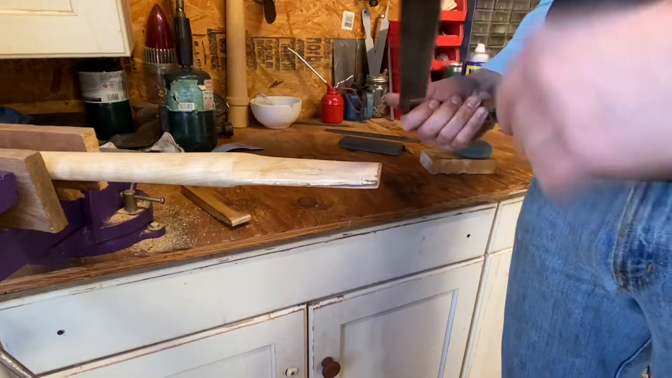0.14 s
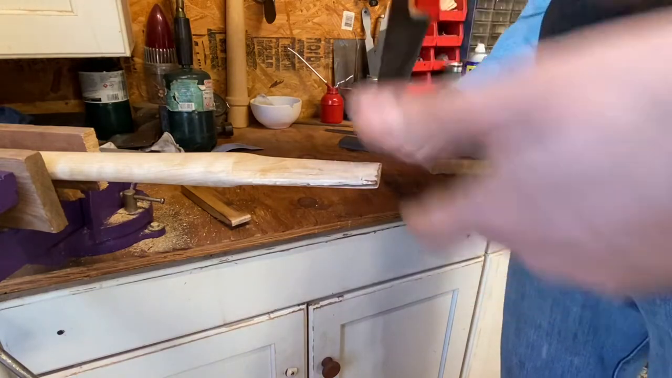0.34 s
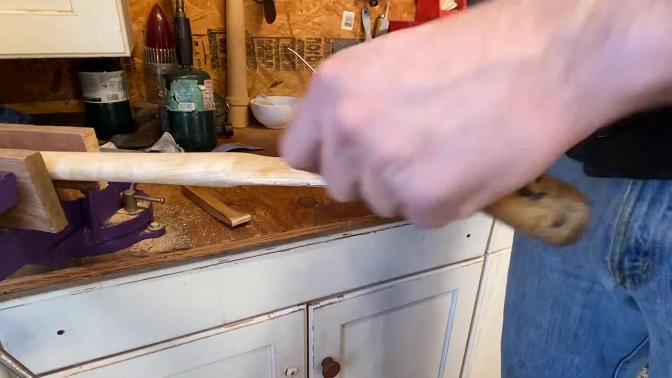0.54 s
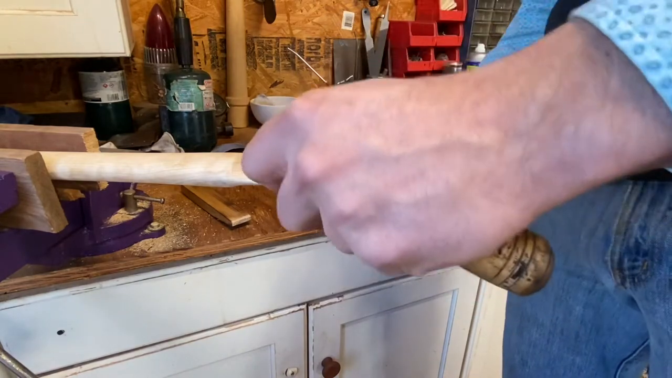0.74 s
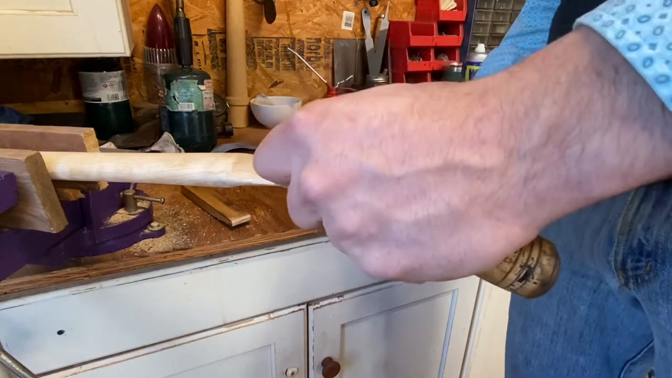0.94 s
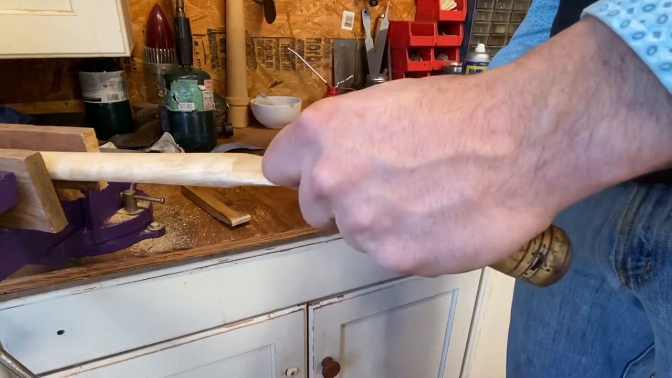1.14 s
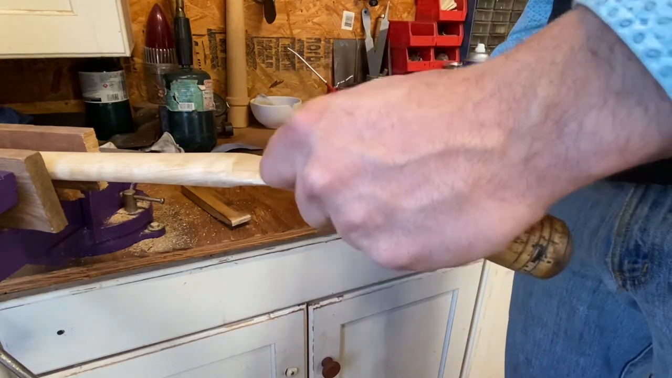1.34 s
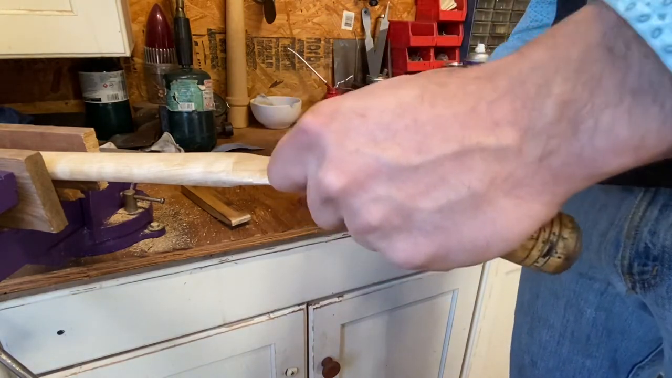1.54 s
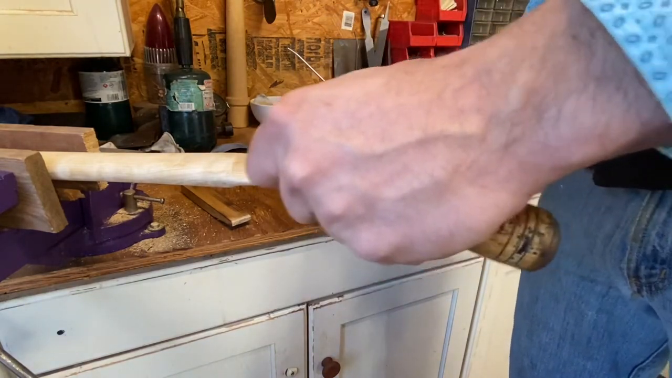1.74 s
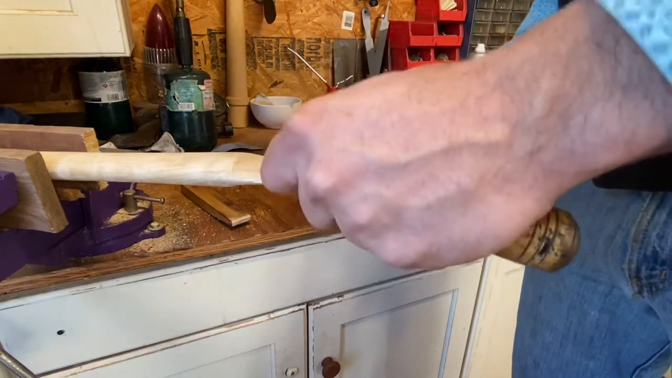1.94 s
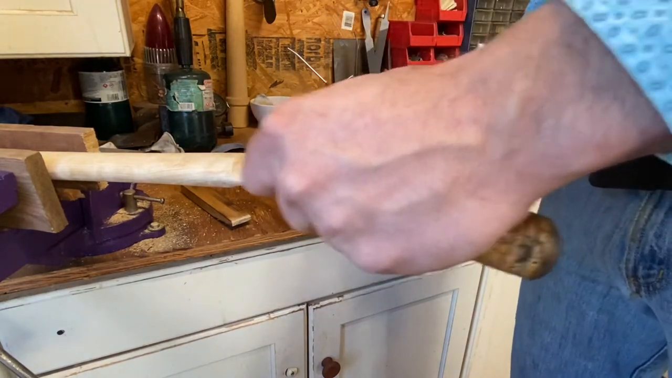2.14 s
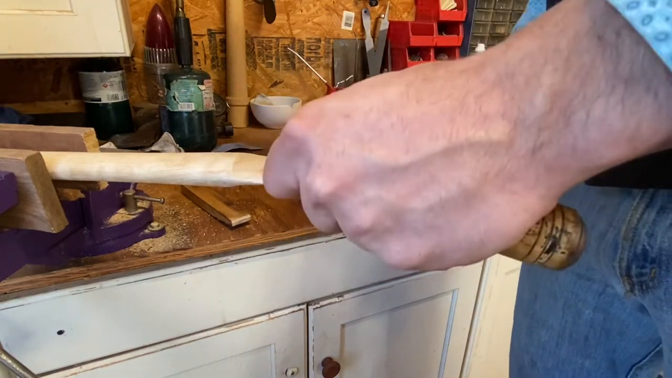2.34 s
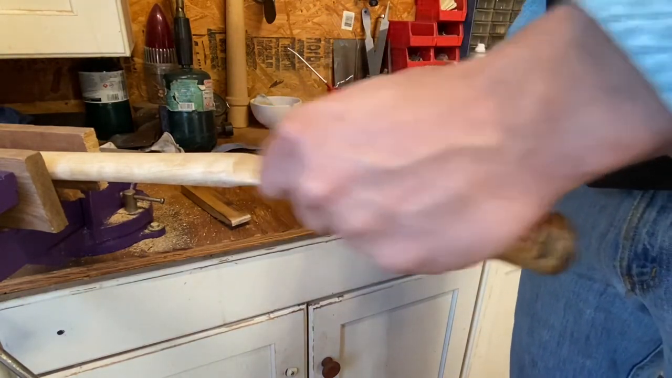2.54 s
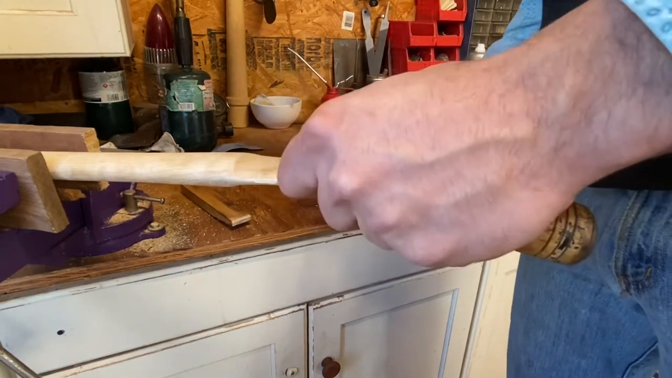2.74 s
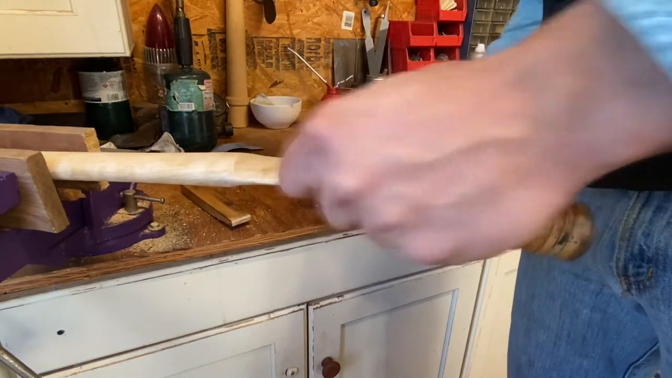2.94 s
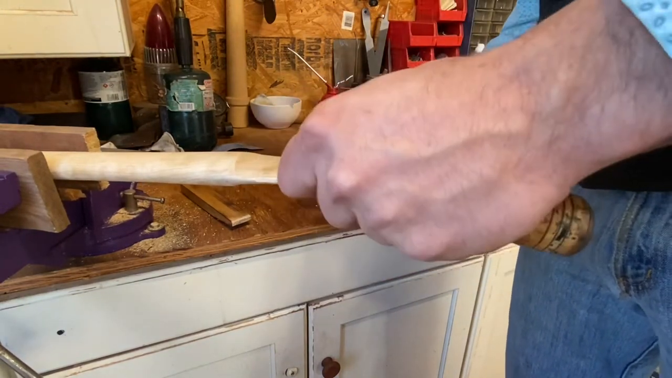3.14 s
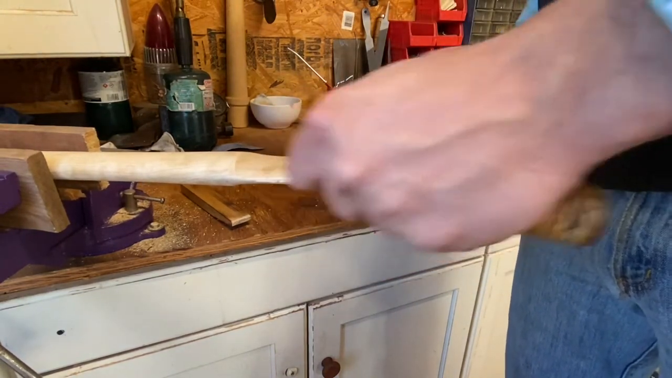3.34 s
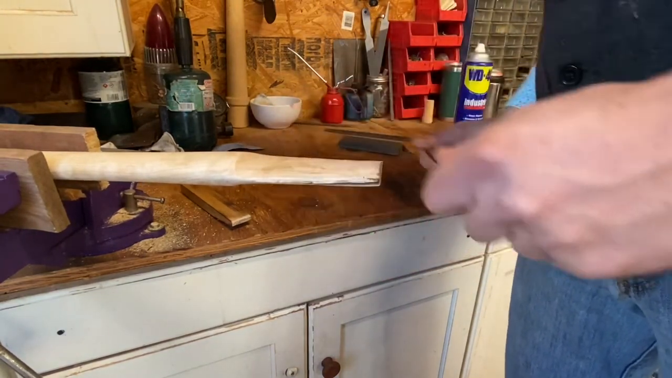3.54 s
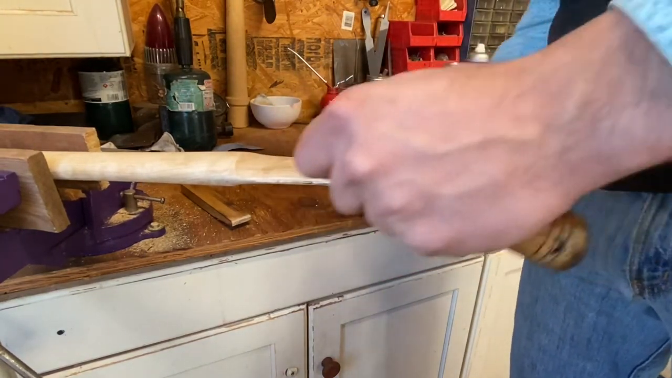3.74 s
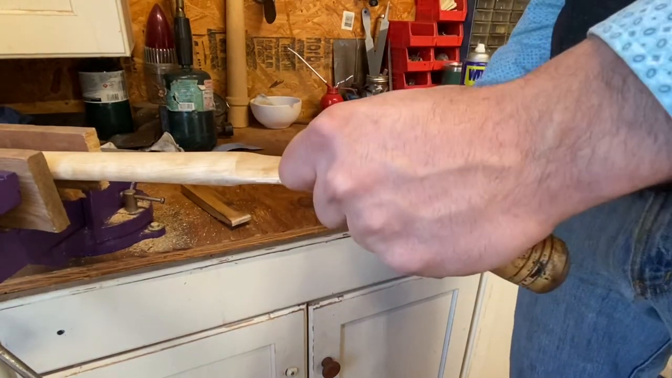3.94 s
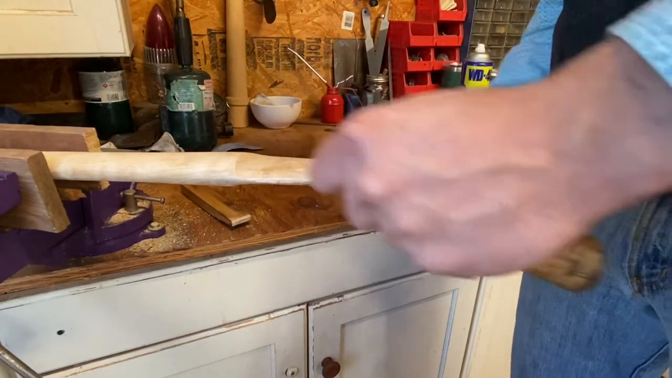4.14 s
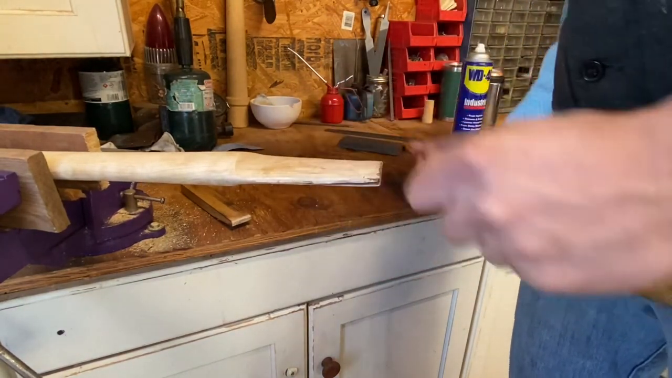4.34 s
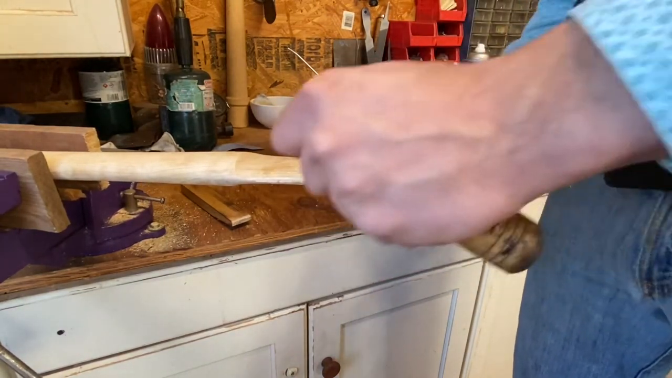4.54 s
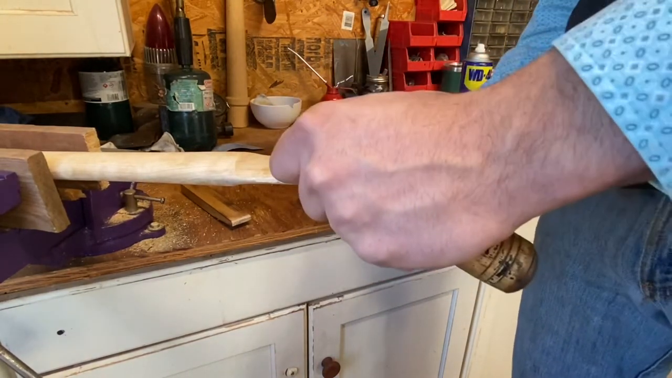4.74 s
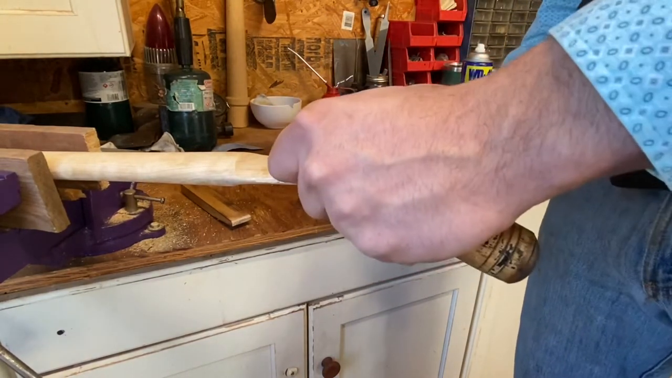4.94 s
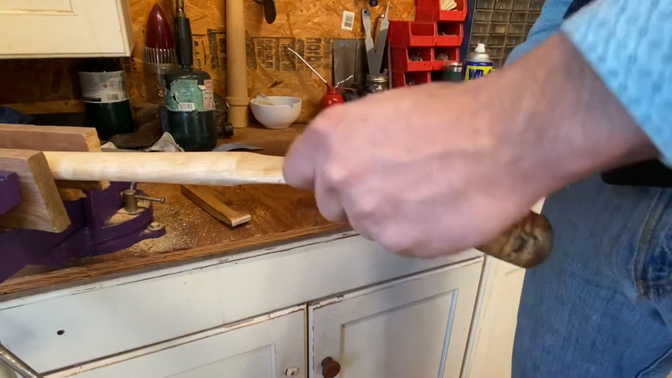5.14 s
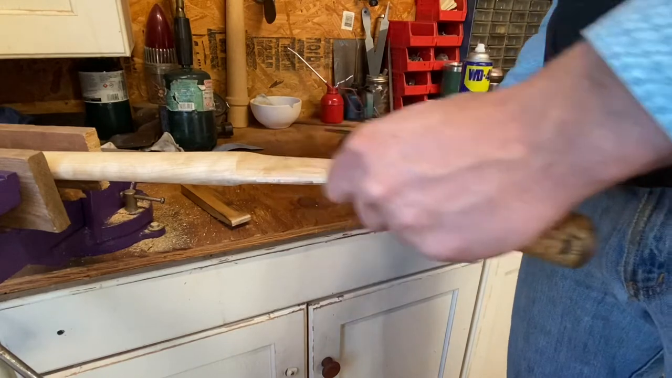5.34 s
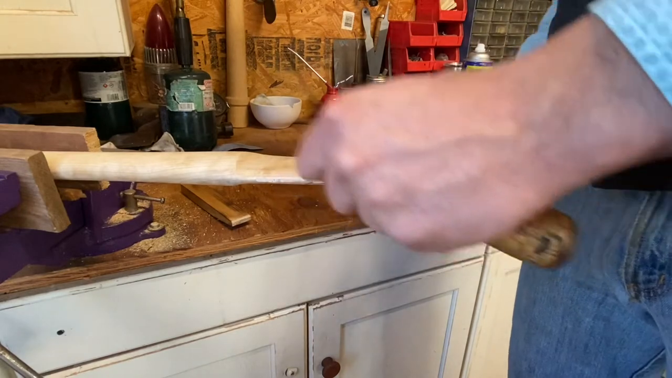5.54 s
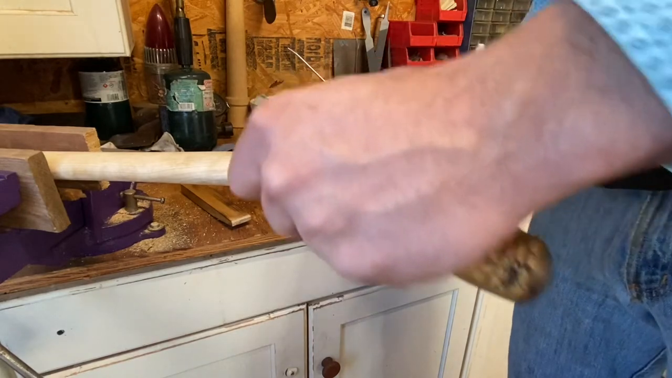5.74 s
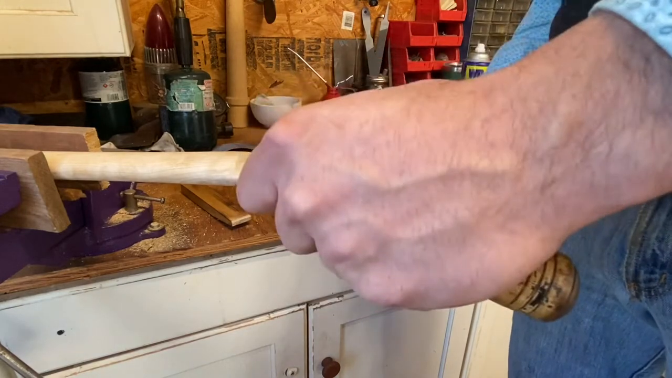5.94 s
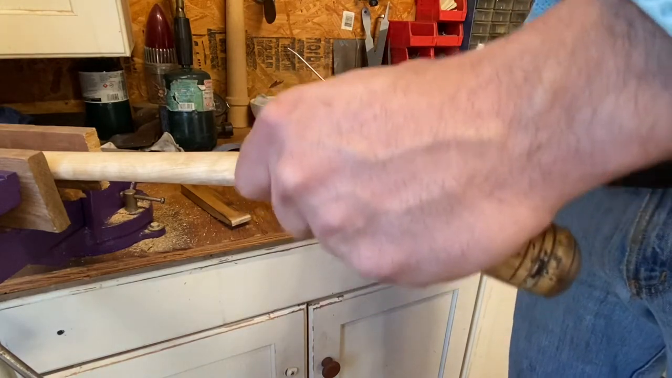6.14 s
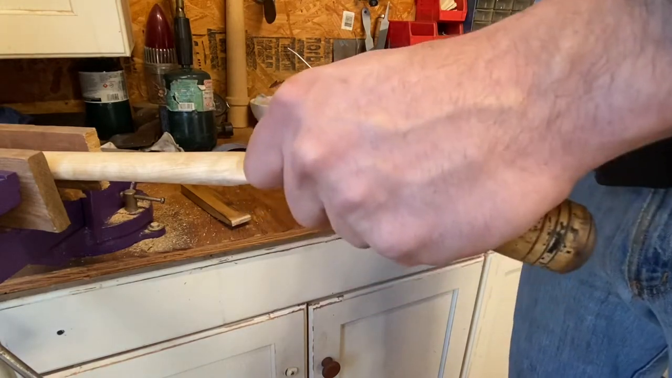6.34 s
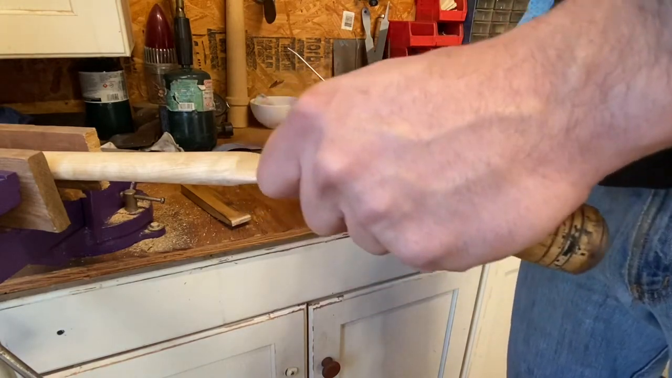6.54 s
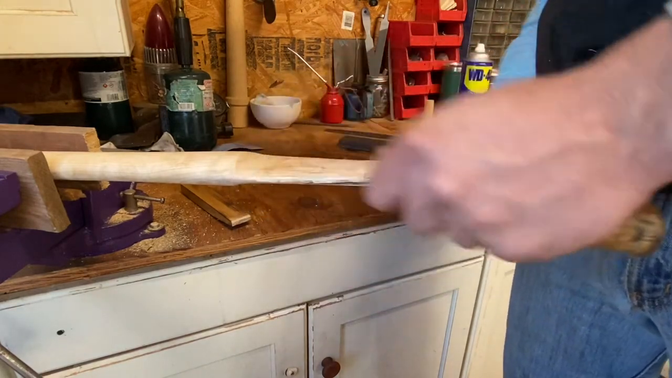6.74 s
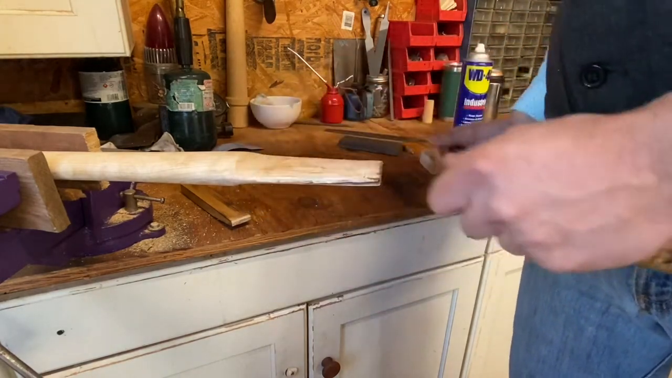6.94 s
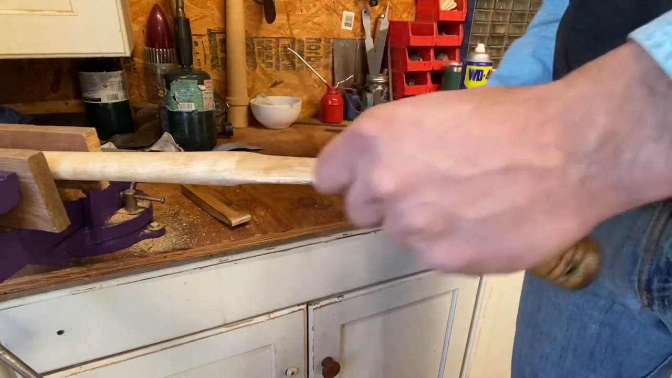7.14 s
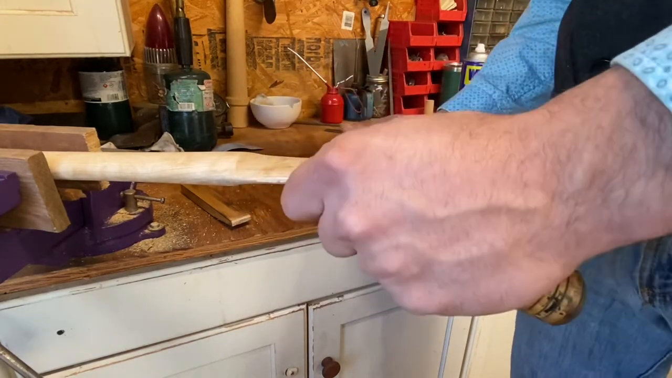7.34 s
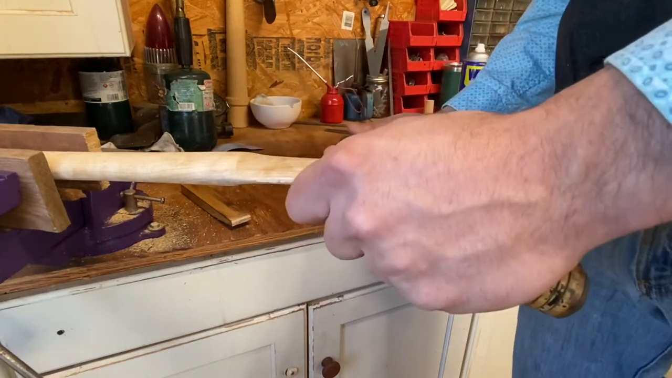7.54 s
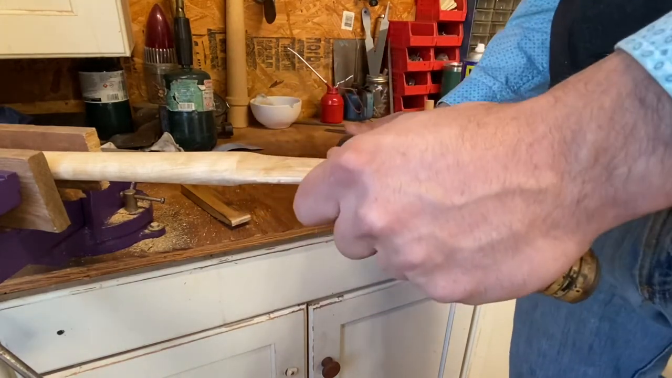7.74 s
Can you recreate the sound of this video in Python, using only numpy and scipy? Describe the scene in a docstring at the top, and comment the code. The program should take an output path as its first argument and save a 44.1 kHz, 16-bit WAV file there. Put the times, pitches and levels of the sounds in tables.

```python
"""In a small workshop a drawknife shaves a stick held in a bench vice, heard close by in stereo.
Each pull rasps as filtered stick-slip noise and shakes the stick's modes; most pulls end in a knock as the
chip breaks: a noise burst through wood, blade and bench top. The bench booms in deep decaying modes after
each knock. Sliding back, the blade rubs softly and sings. Faint rustles and fading hiss lie over a low
room rumble, both as coloured noise."""
import sys
import numpy as np
from scipy import signal
from scipy.fft import rfft, irfft
from scipy.io import wavfile
from scipy.ndimage import uniform_filter1d

SR = 44100
rng = np.random.default_rng(int(sys.argv[2]) if len(sys.argv) > 2 else 0)


def store_wav(level_fs):
    """Save 16-bit WAV to argv[1]."""
    pcm = np.round(np.clip(np.atleast_2d(level_fs), -1, 1) * 32767)
    wavfile.write(sys.argv[1], SR, pcm.T.astype(np.int16))


N = 343980

# Cutting pulls, each catch of the edge a row; end level before the source gains:
# start_s, length_s, end_level_db, swell_db, stick_shake_db
PULLS = [(0.952, 0.049, -49, 18, -1), (1.009, 0.032, -55, -2, 18.5), (1.411, 0.059, -42, 21, 13.5),
         (1.738, 0.064, -40.5, 30.5, 8), (2.089, 0.063, -39.5, 24.5, 1), (2.459, 0.069, -41, 25.5, -16),
         (2.858, 0.062, -38.5, 30, -8), (3.224, 0.068, -42.5, 29.5, 6), (3.98, 0.061, -44, 27, 11),
         (4.049, 0.048, -45, 1.5, 13), (4.094, 0.075, -44.5, 12.5, -12), (4.868, 0.025, -64.5, 10, -9),
         (5.043, 0.051, -40, 23.5, 2), (5.213, 0.018, -49.5, 21, 5), (5.253, 0.1, -57.5, -2, -20),
         (6.094, 0.04, -60.5, -1, -1), (6.568, 0.079, -42.5, 18.5, 16), (6.643, 0.069, -42.5, 22, 1),
         (7.394, 0.049, -56, 3.5, 14), (7.744, 0.049, -59, 14, 18.5)]
# Light rubs as the blade slides back, before the source gains: start_s, length_s, level_db, singing_pitch_hz
RUBS = [(1.305, 0.14, -58, 4840), (1.635, 0.14, -61, 4910), (1.98, 0.13, -59, 4760),
        (2.325, 0.15, -54.5, 4950), (2.695, 0.21, -57.5, 4990), (3.085, 0.15, -61, 4940),
        (3.925, 0.044, -67.5, 2473), (6.025, 0.047, -77.5, 2470), (6.462, 0.069, -59, 2490),
        (7.32, 0.1, -60, 2330), (7.58, 0.056, -73, 2470), (7.67, 0.075, -76, 2430)]
# Broad colour of the rasp, relative: frequency_hz, density_db_per_hz
RASP_SPECTRUM = [(250, 31), (1000, 14.5), (3000, 5), (7000, -16.5), (11500, -24.5), (13300, -21.5),
                 (15000, -35.5)]
# Resonances of the blade, relative: frequency_hz, width_hz, level_db
BLADE_RESONANCES = [(1000, 250, -3), (1800, 300, -5), (2550, 450, -3), (3300, 300, -5), (4980, 900, 4),
                    (6800, 600, -3)]
# Modes of the clamped stick, relative: frequency_hz, level_db, t60_s
STICK_MODES = [(1020, 12, 0.014), (1324, 6, 0.012), (1660, 4, 0.014), (2500, 4, 0.011)]
# Knocks, edge and steel relative to the crack, before the source gains:
# start_s, crack_db, edge_db, low_boom_db, high_boom_db, steel_db
KNOCKS = [(0.708, -49, 2.5, -37.5, -38.5, 1.5), (1.035, -41.5, 6.5, -23, -25, 0),
          (1.475, -30.5, 12, -18, -20, 8.5), (1.796, -32.5, -8, -25, -24, -8),
          (2.15, -23.5, 2.5, -14.5, -19, -14), (2.524, -27.5, 4.5, -25, -19.5, -5.5),
          (2.913, -31.5, -7, -21, -18, 3), (3.277, -39.5, 13.5, -16.5, -23.5, 1.5),
          (3.294, -29.5, -2, -19.5, -22.5, -8), (3.808, -43.5, -17, -39, -37, -10),
          (4.098, -52, -2, -22, -33, -1), (4.161, -24, -9, -19, -25.5, -9),
          (4.658, -41, -0.5, -31.5, -33.5, 2), (4.825, -75, -8, -35.5, -49, 16.5),
          (4.889, -53.5, 5, -28, -33, -19), (5.095, -39.5, -3, -24.5, -29.5, -6),
          (5.228, -45.5, 8, -25.5, -34.5, 6.5), (5.750, -42, 5.5, -30, -32, 7),
          (6.109, -48.5, 7, -24, -38, 4), (6.473, -54.5, -6, -30, -43, -13),
          (6.604, -48.5, 14.5, -23.5, -31.5, -20), (6.707, -23, -19, -19.5, -29.5, -14),
          (7.162, -42, -5, -28, -31, 14)]
# Thud of the dense wooden body, relative: frequency_hz, density_db_per_hz
THUD_SPECTRUM = [(150, -0.5), (300, -5.5), (720, 11), (1100, 13.5), (1600, 12), (2300, 7.5), (6000, -24.5)]
# Modes of the hand-damped blade struck on wood, relative: frequency_hz, level_db, t60_s
STEEL_MODES = [(1400, -4, .009), (1660, -1, .009), (2080, 1, .014), (2480, 1, .011), (3000, -3, .005),
               (4300, -12, .005)]
# Rattling modes of the bench top, relative; ring() caps the decay at 0.04 s: frequency_hz, level_db, t60_s
BENCH_TOP_MODES = [(180, -7.5, 0.098), (249.2, 3.5, 0.073), (318, 0.5, 0.031), (441, -2.5, 0.061)]
# Deep modes of the bench, before detuning and sag: frequency_hz, level_db, t60_s
LOW_BOOM_MODES = [(49.96, -3, 0.43), (66.05, -3, 0.5), (83.3, -1, 0.41), (100.1, 0, 0.26)]
# Higher boom mode of the bench, before detuning and sag: frequency_hz, level_db, t60_s
HIGH_BOOM_MODES = [(131.6, 3, 0.33)]
# Reverberation time of the room: frequency_hz, t60_s
ROOM_DECAY = [(150, 0.67), (1100, 0.26), (2900, 0.21), (7700, 0.28), (15000, 0.11)]
# Mean phase difference between the channels, left over right: frequency_hz, phase_rad
STEREO_PHASE = [(0, 0), (800, 1.9), (9000, 1.3), (10400, 0), (11700, 0), (13300, -3.2), (15000, -6.3)]
# Rms stray of that phase difference: frequency_hz, stray_rad
PHASE_STRAY = [(300, 0), (2000, .8), (8500, .8), (10000, .2)]
# Level lean between the channels: frequency_hz, left_minus_right_db
STEREO_LEAN = [(180, 0), (550, -0.5), (1650, 1), (4970, 4.5), (9500, 1)]
# Faint rustles and fading hiss: start_s, level_db, fade_db_per_s
RUSTLES = [(0, -58, 210), (0.098, -65.5, 67), (0.182, -63, 106), (0.4, -61, 39), (3.322, -60.5, 37.5),
           (4.298, -72, 21), (6.78, -67, 23)]
# Colour of the rustle and hiss, relative: frequency_hz, density_db_per_hz
RUSTLE_SPECTRUM = [(500, 4), (1200, -4), (5000, -8), (11500, -13), (15000, -20.5)]
# Colour of the room rumble, relative: frequency_hz, density_db_per_hz
RUMBLE_SPECTRUM = [(20, -19.5), (45, 0.5), (64, -13), (120, -15), (245, -22.5), (800, -36.5), (1200, -43.5),
                   (6000, -59.5)]
# Left-right likeness of rustle and rumble: frequency_hz, coherence (no unit)
LIKENESS = [(60, 0.94), (250, 0.16), (3000, 0.094), (15000, 0.38)]

BITE_S, LET_GO_S = 0.015, 0.006  # the edge digs in; the edge comes free
DEPTH_DB = 7.5  # the stick's share of the shaking grows by this much along a pull
RUB_PEAK, RUB_ROUND = 0.48, 1.5  # share of the slide at top speed; exponent from speed to level
SING_WIDTH_HZ, SING_DB = 500, -6  # bandwidth of each pole; level relative to the rub's rasp
CRACK_RISE_S, STEEL_RISE_S, THUD_RISE_S = 0.001, 0.003, 0.007  # treble snaps first, wood answers last
WOBBLE_DB = 2.2  # rms level wobble of the booms
RUSTLE_RISE_S, RUSTLE_PATCHY_DB = 0.006, 1.2
RUMBLE_DB = -50.5
EDGE_HZ = 15800


def strokes():
    """Stick-slip excitation: pulls tear fibres and shake the stick; softer slides let the blade sing more."""
    pull, shake = pulling()
    tear = shifting(slips(grain_db=2.5, chatter_db=1.5), patchy_db=2.2)
    torn = gain_of(8.0) * pull * rasp(tear, singing=0.82, tilt_db=8.0)
    stick = gain_of(15.5) * ring(tear * shake, STICK_MODES)

    rub, pitch = sliding()
    slide = shifting(slips(grain_db=2.4, chatter_db=1.5), patchy_db=1.8)
    song = gain_of(SING_DB) * evened(resonate(slide, pitch, SING_WIDTH_HZ))
    rubbed = gain_of(5.5) * rub * (rasp(slide, singing=1.0, tilt_db=7.5) + song)
    return torn + stick + rubbed


def pulling():
    """Cutting force as gains of rasp and stick: the edge bites, digs deeper along the pull and comes free."""
    t, level, shake = np.arange(N) / SR, np.zeros(N), np.zeros(N)
    for start, length, end_db, swell_db, shake_db in PULLS:
        u = np.clip(t - start, 0, length)
        bite = np.minimum(u / BITE_S, 1) ** 2
        depth = gain_of(end_db - swell_db * (1 - u / length))
        free = np.exp(-np.clip(t - start - length, 0, 1) / LET_GO_S)
        cut = bite * depth * free
        level += cut
        shake += cut * gain_of(shake_db - DEPTH_DB * (4.5 - u / length))
    return level, shake


def sliding():
    """Friction level follows speed: the hand speeds up and slows in one arch; also gives the singing pitch."""
    t, level, pitch = np.arange(N) / SR, np.zeros(N), np.full(N, RUBS[0][3], float)
    for start, length, level_db, pitch_hz in RUBS:
        u = np.clip((t - start) / length, 0, 1) ** (np.log(0.5) / np.log(RUB_PEAK))
        level += gain_of(level_db) * abs(np.sin(np.pi * u)) ** RUB_ROUND
        pitch[t >= start] = pitch_hz
    return level, pitch


def slips(grain_db, chatter_db):
    """Stick-slip noise: dense tiny slips of uneven size come in flurries of a few milliseconds."""
    chatter = chatter_db * evened(smoothed(rng.standard_normal(N), 250, 250))
    grain = grain_db * np.minimum(rng.exponential(1, N), 3)
    return evened(rng.standard_normal(N) * gain_of(grain + chatter))


def shifting(x, patchy_db):
    """Time-varying filtering: the wood's grain changes along the stroke, so bands of colour come and go."""
    z = signal.stft(x, nperseg=256, noverlap=192)[2]
    patches = rng.standard_normal(z.shape[::-1]).T
    patches = uniform_filter1d(uniform_filter1d(patches, 3, axis=0), 24, axis=1)
    z = z * gain_of(patchy_db * evened(patches))
    return evened(signal.istft(z, nperseg=256, noverlap=192)[1][:N])


def rasp(x, singing, tilt_db):
    """Source and filter: slips take the rasp's broad colour, a tilt in dB an octave and blade resonances."""
    def gain(f):
        blade = sum(gain_of(db) / np.abs(1 + 2j * (f - hz) / width) ** 2 for hz, width, db in BLADE_RESONANCES)
        slope = gain_of(tilt_db * np.log2((f + 100) / 4000))
        return gain_of(read(RASP_SPECTRUM, f)) * slope * (1 + singing * blade)
    return evened(colour(x, gain))


def resonate(x, hz, width_hz):
    """Heterodyne resonance: two equal poles follow the pitch curve hz."""
    turn = np.exp(2j * np.pi * np.cumsum(hz) / SR)
    r = np.exp(-np.pi * width_hz / SR)
    return (turn * signal.lfilter([1], np.convolve([1, -r], [1, -r]), x / turn)).real


def knocks():
    """Impact excitation: cracking splinters ring the blade and thud in the wood; the bench top rattles."""
    _, crack_db, edge_db, _, high_db, steel_db = np.transpose(KNOCKS)
    splinters = slips(grain_db=1.4, chatter_db=1.0)
    wood = evened(colour(splinters, lambda f: gain_of(read(THUD_SPECTRUM, f))))
    thud = wood * burst(crack_db, THUD_RISE_S, 0.0068)

    treble = colour(splinters, lambda f: gain_of(read(RASP_SPECTRUM, f)) * f ** 4 / (f ** 4 + 2600 ** 4))
    edge = evened(treble) * burst(crack_db + edge_db - 6.0, CRACK_RISE_S, 0.011)

    steel = ring(splinters * burst(crack_db + steel_db, STEEL_RISE_S, 0.012), STEEL_MODES)
    bench_top = ring(rng.standard_normal(N) * burst(high_db - 9.0, 0.0076, 0.029), BENCH_TOP_MODES)
    return thud + steel + bench_top + edge


def burst(db, rise_s, fall_s):
    """Exponential rise and decay: one envelope a knock, peaking at the given levels."""
    u = np.arange(SR // 4) / SR
    shape = (1 - np.exp(-u / rise_s)) * np.exp(-u / fall_s)
    train = np.zeros(N)
    np.add.at(train, np.round(np.transpose(KNOCKS)[0] * SR).astype(int), gain_of(db))
    return signal.oaconvolve(train, shape / shape.max())[:N]


def booms():
    """Modal decay: the bench booms after each knock; its modes build up, sag in pitch and die away unevenly."""
    u, out = np.arange(SR // 2) / SR, np.zeros(N + SR)
    chance = rng.random((len(KNOCKS), 2, len(LOW_BOOM_MODES) + len(HIGH_BOOM_MODES)))
    for (start, _, _, low_db, high_db, _), (phases, detunes) in zip(KNOCKS, chance):
        modes = [(hz, db + low_db, t60) for hz, db, t60 in LOW_BOOM_MODES]
        modes += [(hz, db + high_db, t60) for hz, db, t60 in HIGH_BOOM_MODES]
        for (hz, db, t60), phase, detune in zip(modes, phases, detunes):
            rise = 1 - np.exp(-(u * hz / 3.74) ** 2)  # over a few cycles
            swell = rise * gain_of(db - 60 * u / t60)
            turns = hz * (1 + 0.06 * (detune - 0.5)) * (u - 0.415 * u ** 2)  # the square term lowers the pitch
            out[round(start * SR):][:len(u)] += swell * np.sin(2 * np.pi * (turns + phase))
    wobble = evened(smoothed(rng.standard_normal(N), 700, 700))  # loose joints
    return gain_of(WOBBLE_DB * wobble) * out[:N]


def ring(x, modes, longest_s=1 / 25):
    """Modal synthesis: x excites a few strongly damped modes, with t60 held to 0.005 s up to longest_s."""
    t = np.arange(SR // 4) / SR
    body = np.zeros(len(t))
    for hz, db, t60 in modes:
        body += gain_of(db - 60 * t / np.clip(t60, 1 / 200, longest_s)) * np.sin(2 * np.pi * hz * t)
    return signal.oaconvolve(x, body / np.linalg.norm(body))[:N]


def spread(x):
    """Stereo spread: a level lean and a slowly straying phase difference between the channels."""
    hz, _, z = signal.stft(x, SR, nperseg=512, noverlap=384)
    stray = rng.standard_normal(z.shape[::-1]).T
    stray = evened(smoothed(smoothed(stray, 6, 6, axis=0), 40, 40, axis=1))
    phase = np.interp(hz, *np.transpose(STEREO_PHASE))[:, None] + read(PHASE_STRAY, hz)[:, None] * stray
    half = gain_of(read(STEREO_LEAN, hz) / 2)[:, None] * np.exp(0.5j * phase)
    return signal.istft(np.array([z * half, z / half]), nperseg=512, noverlap=384)[1][:, :N]


def room(x):
    """Diffuse reverberation: sparse taps of random sign decay band by band; three tails take turns."""
    at = np.arange(300, SR // 2 - 20, 20)
    at = at + rng.integers(0, 20, (3, 2, len(at)))
    taps = np.zeros((3, 2, SR // 2))
    np.put_along_axis(taps, at, rng.choice([-1., 1.], at.shape), 2)
    hz, t, z = signal.stft(taps, SR, nperseg=256)
    tails = signal.istft(z * gain_of(-60 * t / read(ROOM_DECAY, hz)[:, None]), SR, nperseg=256)[1]
    tails /= np.linalg.norm(tails[0, 0])

    x = colour(x, lambda f: f ** 2 / (f ** 2 + 223.0 ** 2))  # the bass is mostly direct
    turn = np.pi * np.arange(N) / SR  # one half turn a second
    out = np.zeros((2, N))
    for k, tail in enumerate(tails):
        share = np.sqrt(2 / 3) * np.cos(turn + k * np.pi / 3)
        out += signal.oaconvolve((share * x)[None], tail, axes=1)[:, :N]
    return out


def rustling():
    """Envelope of faint rustles and fading hiss: each starts quickly and fades; overlaps add in power."""
    start, level_db, fade_db = np.transpose(RUSTLES)[:, :, None]
    u = np.arange(N) / SR - start
    gains = np.clip(u / RUSTLE_RISE_S, 0, 1) * gain_of(level_db - fade_db * abs(u))
    return np.sqrt(np.sum(gains ** 2, axis=0))


def wide_noise(spectrum, patchy_db):
    """Partial coherence: two partly alike channels of coloured noise with drifting patches."""
    hz = np.fft.rfftfreq(1024, 1 / SR)
    a, b, c, d, patches = rng.standard_normal((N // 256 + 5, 513, 5)).T
    patches = evened(uniform_filter1d(uniform_filter1d(patches, 14, 0), 10, 1))
    same = np.clip(read(LIKENESS, hz), -1, 1)[:, None]
    left = a + 1j * b
    right = same * left + np.sqrt(1 - same ** 2) * (c + 1j * d)
    z = np.array([left, right]) * gain_of(read(spectrum, hz)[:, None] + patchy_db * patches)
    return evened(signal.istft(z, nperseg=1024, noverlap=768)[1][:, :N])


def gain_of(db):
    """Logarithmic level: decibels to amplitude."""
    return 10 ** (np.asarray(db) / 20)


def evened(x):
    """Power normalization: scales to rms 1."""
    return x / np.sqrt(np.mean(x ** 2) + 1e-20)


def smoothed(x, first, second, axis=-1):
    """Moving average: two passes of the given lengths in samples or cells."""
    return uniform_filter1d(uniform_filter1d(x, first, axis=axis), second, axis=axis)


def read(points, hz):
    """Interpolation: reads a table over log frequency."""
    f, value = np.transpose(points)
    return np.interp(np.log(hz + 1), np.log(f + 1), value)


def colour(x, gain):
    """Linear filtering: multiplies the spectrum by a gain given as a function of frequency."""
    return irfft(rfft(x) * gain(np.fft.rfftfreq(N, 1 / SR)), N)


def scene():
    """Superposition: bench work, direct and reverberant, over rustle, hiss and rumble."""
    work = strokes() + knocks() + booms()
    rustle = rustling() * wide_noise(RUSTLE_SPECTRUM, RUSTLE_PATCHY_DB)
    rumble = gain_of(RUMBLE_DB) * wide_noise(RUMBLE_SPECTRUM, patchy_db=1.1)
    return spread(work) + gain_of(-10.0) * room(work) + rustle + rumble


def record(dry):
    """Band limiting: a steep linear-phase low-pass at EDGE_HZ."""
    lowpass = signal.firwin(511, EDGE_HZ, window=("kaiser", 9), fs=SR)
    return signal.oaconvolve(dry, lowpass[None], "same")


dry = scene()
out = record(dry)
store_wav(out)
```